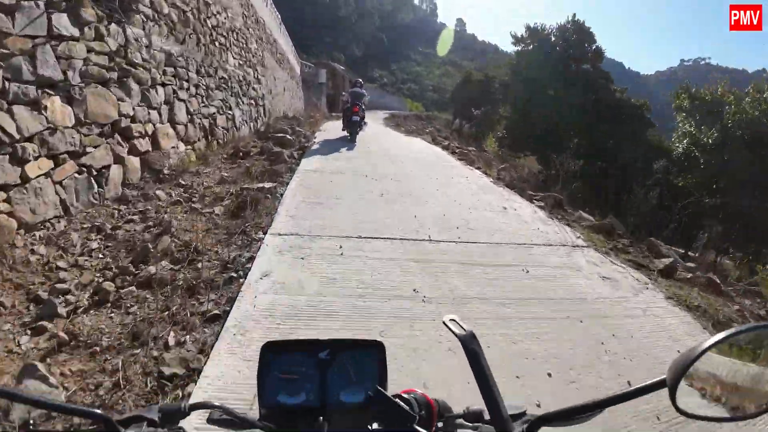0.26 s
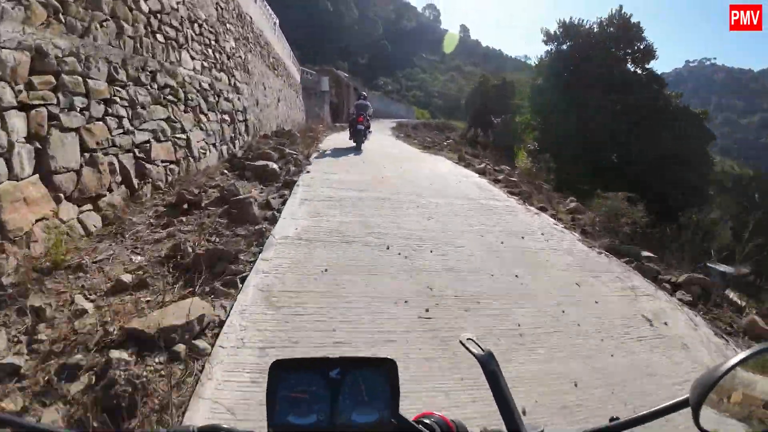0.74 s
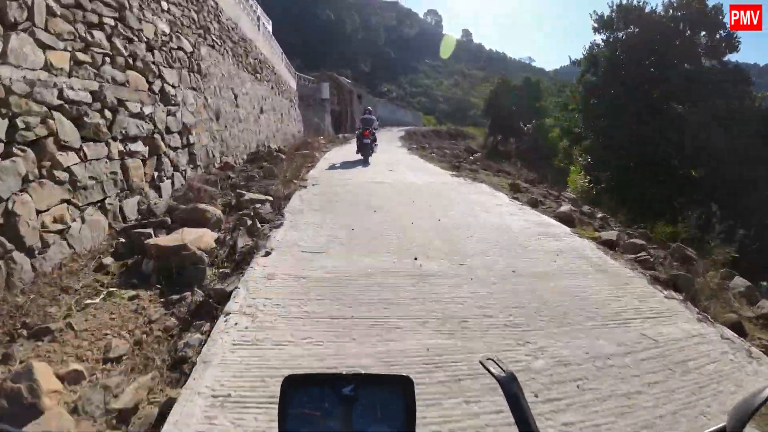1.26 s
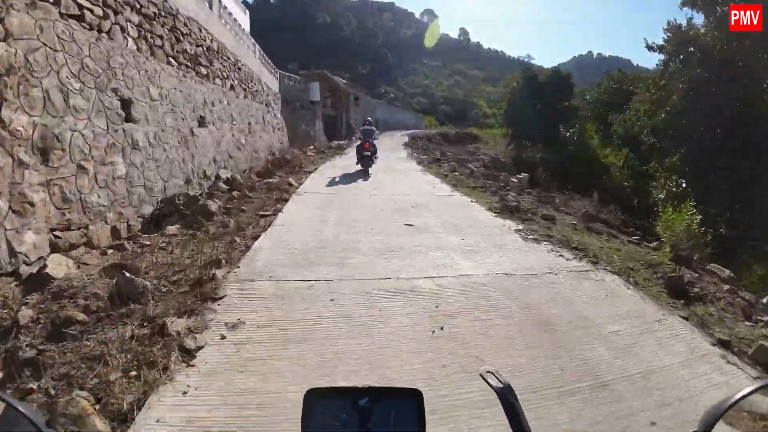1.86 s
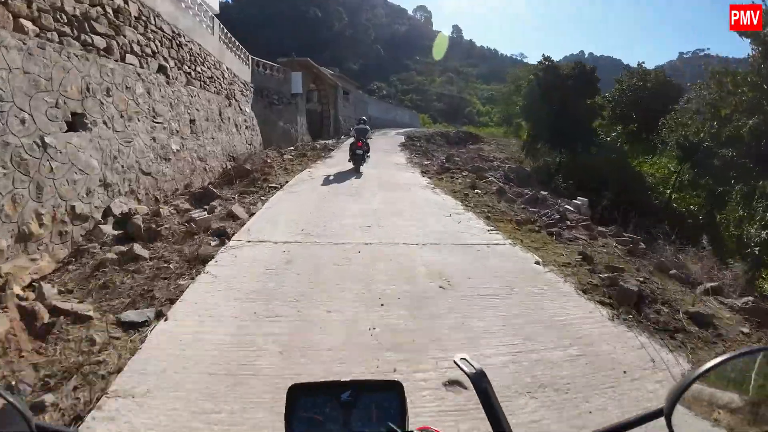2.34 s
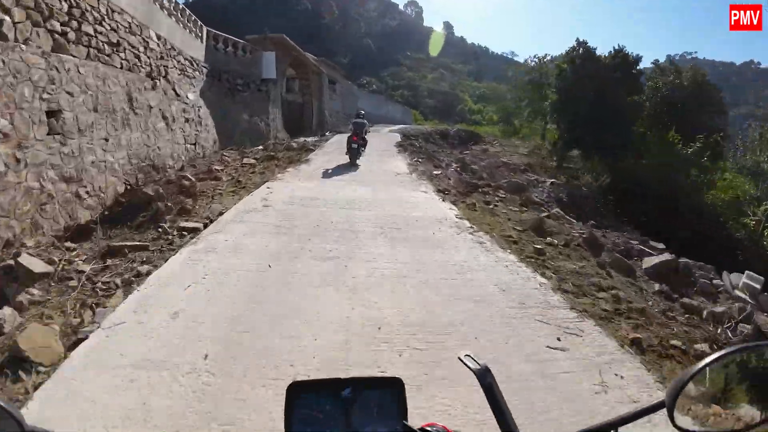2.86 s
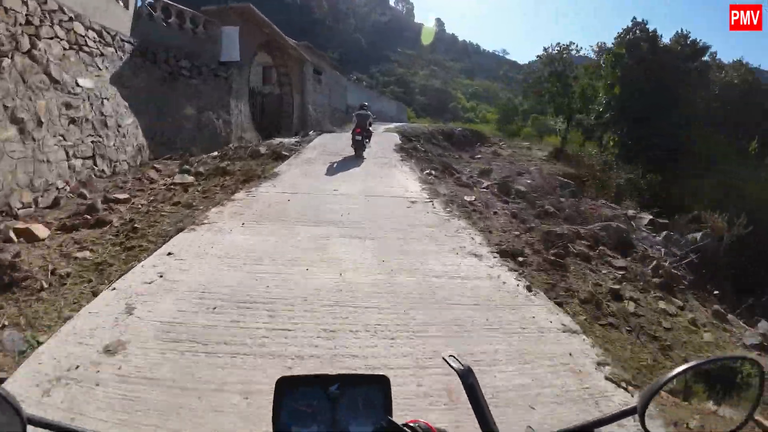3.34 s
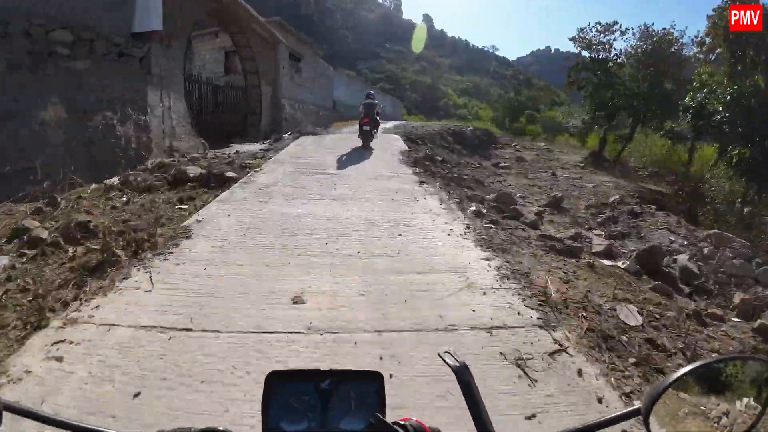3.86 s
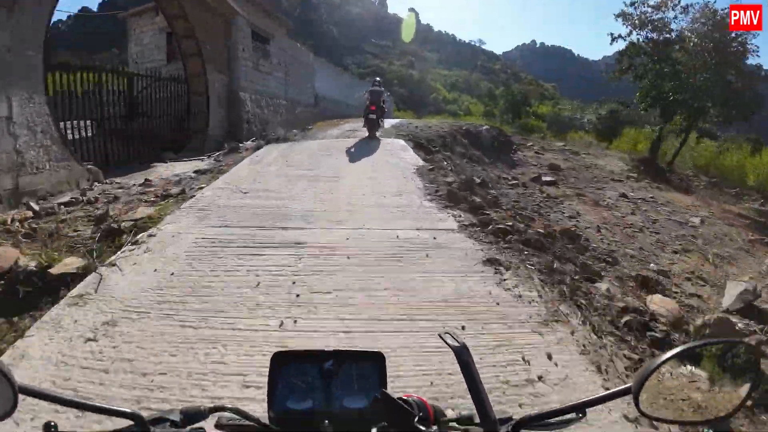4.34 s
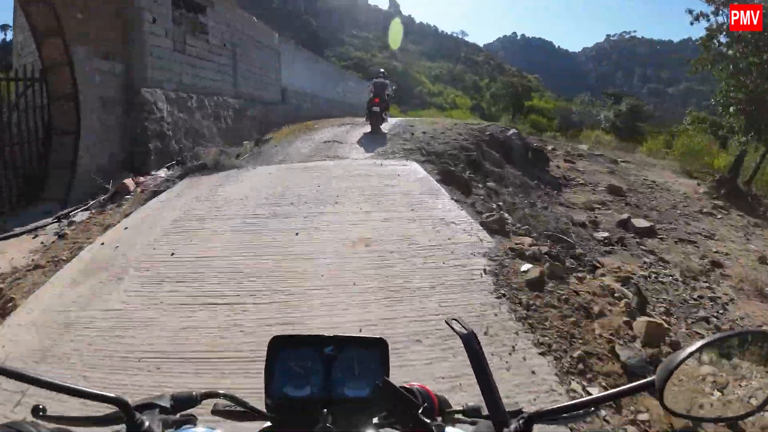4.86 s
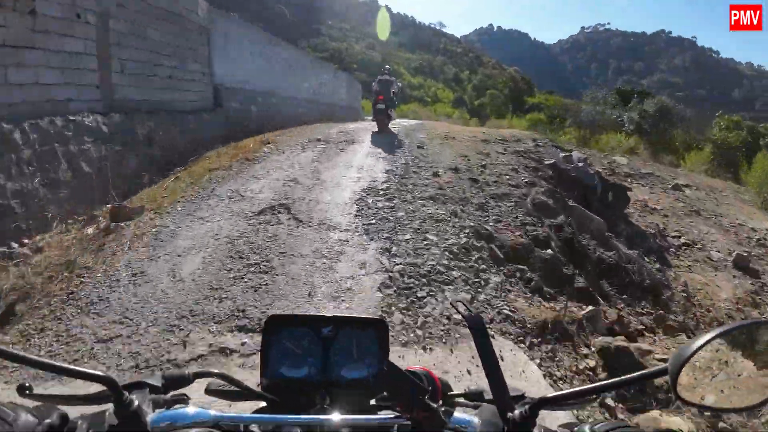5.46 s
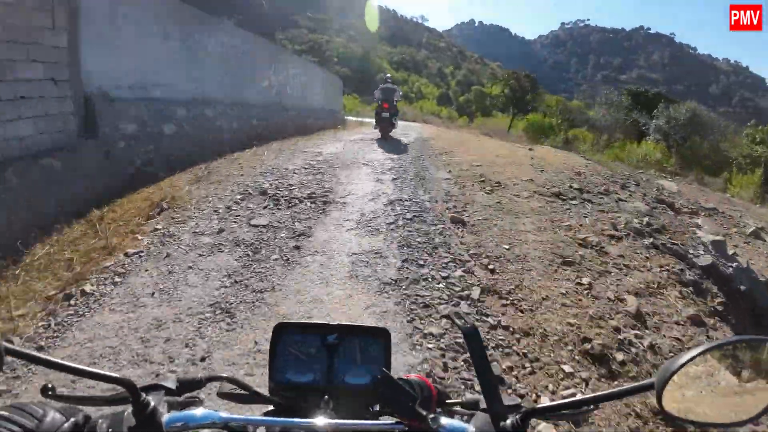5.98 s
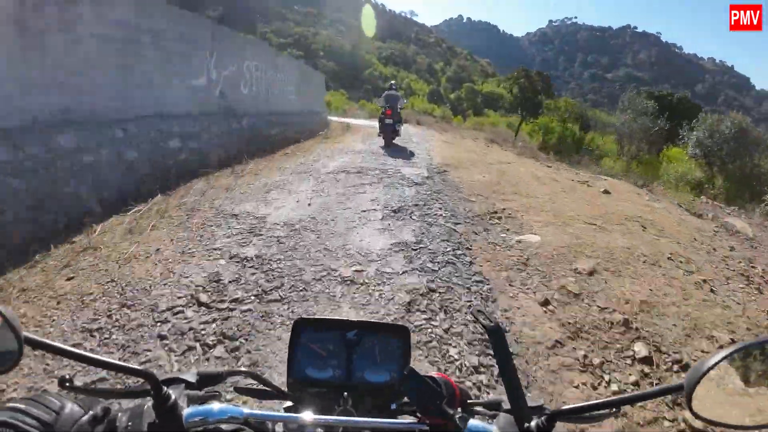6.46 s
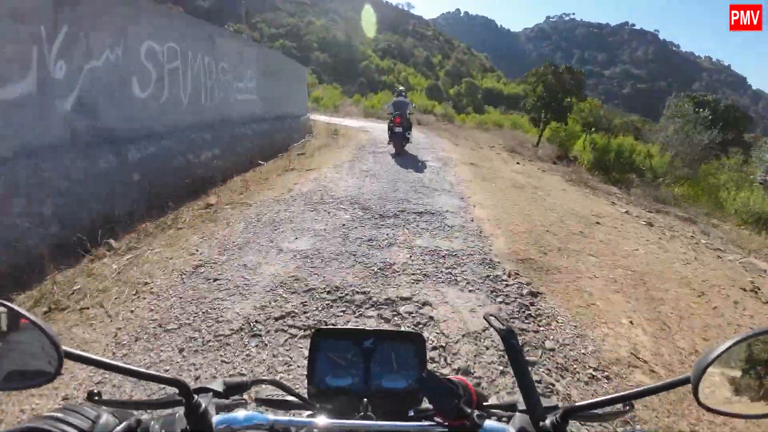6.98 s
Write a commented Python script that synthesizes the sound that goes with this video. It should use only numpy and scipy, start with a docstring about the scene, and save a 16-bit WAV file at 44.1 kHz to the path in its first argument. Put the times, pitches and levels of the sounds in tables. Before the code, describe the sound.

Close on the handlebars of a small single-cylinder motorcycle outdoors. The throaty engine climbs in pitch and loudness for a second and a half, falls away sharply in a brief coasting gear change, then pulls again at a lower note. It settles into an even drone with valve clatter and faint gear whine, finally rolling onto gravel with small stone ticks.

```python
"""A single-cylinder four-stroke motorcycle climbs a concrete lane, heard from the rider's seat.
It revs up, coasts through a gear change, pulls again and eases off onto gravel.
Sums of engine orders make the boom, exhaust and intake; filtered noise makes the gas rasp and valve clatter,
and paired tones at the tooth rate make the gears. Behind them stones tick, gravel patters,
a metal part squeaks faintly, and tyres and headwind rumble as coloured noise."""
import sys
import numpy as np
from scipy import signal
from scipy.fft import rfft, irfft, next_fast_len
from scipy.io import wavfile
from scipy.ndimage import map_coordinates

SR = 44100
rng = np.random.default_rng(int(sys.argv[2]) if len(sys.argv) > 2 else 0)


def generate_wav(sig):
    """Save sig (samples, or channels by samples) to the path in sys.argv[1] as 16-bit PCM at SR."""
    pcm = np.round(np.clip(np.atleast_2d(sig).T, -1, 1) * 32767).astype(np.int16)
    wavfile.write(sys.argv[1], SR, pcm)


N = 318351

# engine speed: (time [s], firing rate [1/s])
ENGINE_SPEED = [(0.0, 39.7), (0.15, 39.55), (0.7, 46.63), (0.95, 49.13), (1.49, 58.24), (1.65, 52.11),
                (2.02, 43.8), (2.25, 32.71), (2.48, 33.42), (2.6, 34.97), (3.55, 40.72), (3.85, 40.75),
                (4.0, 41.75), (4.4, 42.56), (5.5, 38.82), (5.68, 37.17), (5.8, 38.43), (5.95, 37.32),
                (6.62, 38.21), (6.76, 37.13), (6.92, 37.65), (7.22, 37.0)]
# the rider's hand: (time [s], throttle opening [0-1])
THROTTLE_HAND = [(0, 0.6), (.12, 0.53), (.3, 0.76), (.7, 0.77), (1.48, 1), (1.56, 0.44), (2.08, 0.06),
                 (2.3, 0.52), (2.55, 0.82), (3.6, 0.84), (4.0, 0.38), (4.4, 0.51), (4.7, 0.1), (5.68, 0.27),
                 (5.8, .68), (6.7, 0.47), (7.21, 0.3)]
# the gear change: the wheel drives the engine between these times
COAST_FROM_S, COAST_TO_S, COAST_FADE_S = 1.545, 2.045, 0.02
# each change of load leaves a short hush in the boom and intake
HUSH_S, HUSH_DB = 0.024, 8.5
CRUISE_RATE = 40  # firings per second at which the loudness laws start

# the four lowest engine orders:
# (level at shut throttle [dB], rise at full throttle [dB], change while coasting [dB])
LOW_ORDERS = [(-33, -4, -14), (-26.5, 5.5, -3.5), (-43, 5, 4.5), (-47.5, 10, 8.5)]
# how strongly the bike radiates those orders as they sweep: (frequency [Hz], gain [dB])
BODY_RADIATION = [(35, -7), (48, 2), (62, -10.5), (80, -6), (100, -1.5), (118, 0), (135, 10.5), (152, 10),
                  (170, 10.5), (192, 1), (212, 1), (235, 10)]
# brief sags of the crank-rate drone: (time [s], length [s], depth [dB])
DRONE_SAGS = [(3.35, 0.076, 14), (4.106, 0.11, 6), (4.667, 0.062, 7), (4.86, 0.051, 13), (5.084, 0.077, 11),
              (5.58, 0.29, 11), (6.09, .1, 2), (6.51, 0.62, 4), (7.08, 0.31, 5)]

# loudness laws, one per engine sound: (gain at cruising speed with shut throttle [dB],
# rise at full throttle [dB], rise per octave of speed [dB], change while coasting [dB])
BARK_LOUDNESS = (-45.5, 3, 9, -5.5)
PIPE_LOUDNESS = (-69, 11, 21.5, -3)
RASP_LOUDNESS = (-48, 8, 11.5, 0.9)
HONK_LOUDNESS = (-49, 19.5, 7, -2.5)
CLATTER_LOUDNESS = (-58, 3.5, 11.5, -3.5)
HISS_LOUDNESS = (-69.5, 11, 7.5, 4)

# resonances of each part: (centre [Hz], width [Hz], relative level [dB])
SILENCER_MODES = [(165.8, 13.8, 16.5), (430, 310, -16.5), (556.3, 66, 1.5), (663, 31, -13.5)]
PIPE_MODES = [(812, 35, 5.5), (999, 46, 0.5), (1250, 180, -7), (1440, 84, -15), (1810, 400, -30)]
AIRBOX_MODES = [(264.3, 114, 2.5), (325.4, 43, 7.5), (482, 26, -7.5)]
CASING_MODES = [(1396, 180, 0), (1880, 273, 1.5), (2346, 186, 0.5), (2745, 117, 5), (3160, 380, -4.5),
                (3720, 160, -10), (4080, 170, -13), (5420, 250, -14.5), (5930, 260, -13.5)]
# noise colour of the rasping exhaust gas: (frequency [Hz], relative level [dB])
GAS_COLOUR = [(120, -15), (300, 1), (430, -2.5), (580, -2.5), (700, -12), (830, -8.5), (980, -9),
              (1120, -15), (1260, -17.5), (1600, -27.5), (2600, -24), (5000, -48.5)]
# noise colour of hissing air and fine gravel: (frequency [Hz], relative level [dB])
HISS_COLOUR = [(1500, -28.5), (4000, 3.5), (6500, -2), (8000, -5), (9900, -5.5), (11000, -2.5),
               (14500, -6.5), (16000, 3.5)]
# level of the metallic gear whine: (time [s], level [dB])
GEAR_WHINE = [(0, -66), (.3, -51.5), (.9, -61), (1.45, -63), (1.65, -67), (2.6, -64), (3.2, -64),
              (3.55, -57.5), (4.46, -56), (4.7, -66), (5.62, -78), (6.04, -62), (7.21, -64.5)]

# stones and rattles: (time [s], relative level [dB], lower edge of the ringing band [Hz])
STONE_TICKS = [(5.83, -42, 1570), (6.2313, -37, 1540), (6.6894, -51, 2740), (6.7594, -41, 1520),
               (6.788, -31, 1580), (6.9038, -31.5, 1400), (6.9744, -48, 2750), (7.0194, -49, 1810),
               (7.031, -33, 1450)]
# thin metal squeaks: (time [s], length [s], level [dB])
METAL_SQUEAKS = [(1.745, .05, -67), (1.89, .08, -72), (5.696, 0.13, -73), (6.517, .04, -69),
                 (6.81, 0.075, -69.5), (6.948, 0.027, -65), (7.12, .07, -71)]
# noise colour of tyres and headwind: (frequency [Hz], relative level [dB])
ROAD_COLOUR = [(12, -1), (25, -5.5), (70, 0), (120, -5.5), (250, -7.5), (420, -8), (620, -10), (900, -26),
               (1500, -27), (4000, -59)]
TOP_HZ = 15750  # upper band limit of the whole sound


def boom(cycle, suction_at=0.259, lead=0.016, load_delay=0.066, coast_delay=0.16,
         unsteady_db=0.5, idle_unsteady_db=0.74):
    """The lowest orders sweep through the bike's resonances and meet in a suction behind each blow."""
    speed, throttle, coast = curves(ENGINE_SPEED)[0], curves(THROTTLE_HAND)[0], coasting()
    body_hz, body_db = np.transpose(BODY_RADIATION)
    sag_db = sum(depth_db * swell(s, length) for s, length, depth_db in DRONE_SAGS)
    # light throttle burns less evenly
    waver_db = unsteady_db + idle_unsteady_db * (1 - throttle) * (1 - coast)
    # timings are shares of a cycle: the suction comes later under load and when coasting
    stroke = cycle - suction_at - load_delay * throttle - coast_delay * coast
    wave = 0
    for k, (base_db, throttle_db, coast_db) in enumerate(LOW_ORDERS, 1):
        radiated_db = np.interp(np.log(k * speed), np.log(body_hz), body_db)
        db = base_db + throttle_db * throttle + coast_db * coast + radiated_db
        db = db + waver_db * wobble(16)
        if k == 2:  # the crank rate
            db = db - sag_db
        wave = wave - np.sqrt(2) * amp(db) * np.cos(2 * np.pi * k * (stroke + lead * k))
    return wave


def exhaust(cycle):
    """The blow, the piston's push and a late echo ring the silencer and the pipe; the gas rasps."""
    bark_strokes = [(.023, 1), (.21, 0.29), (.635, 0.3)]
    bark = pulse_train(cycle, bark_strokes, SILENCER_MODES, low_hz=171, high_hz=823, count=22)
    ring_strokes = [(.08, 0.8), (.35, 0.62), (.62, 0.41)]
    ring = pulse_train(cycle, ring_strokes, PIPE_MODES, low_hz=626, high_hz=2400, count=38)
    rasp = coloured(noise() * (1.3 + gate(cycle, at=0.22, width=0.22)), GAS_COLOUR)
    bark = loudness(BARK_LOUDNESS) * strength(cycle, scatter_db=0.04) * bark
    return bark + loudness(PIPE_LOUDNESS) * ring + loudness(RASP_LOUDNESS) * rasp


def intake(cycle):
    """The airbox honks at each gulp of air, more weakly at each blow, and loudest at open throttle."""
    gulps = [(0.4507, 0.78), (0.02, 0.28)]
    honk = -pulse_train(cycle, gulps, AIRBOX_MODES, low_hz=154, high_hz=980, count=17)
    return loudness(HONK_LOUDNESS) * strength(cycle, scatter_db=0.3) * honk


def valves(cycle):
    """Tappets and chain rattle the casing, hardest while the valves move; air hisses along."""
    taps = gate(cycle, at=0.17, width=0.017)
    taps = taps + 0.62 * gate(cycle, at=0.67, width=0.016)
    taps = taps + .5 * gate(cycle, at=0.044, width=0.017)
    drive = 0.92 + 0.79 * gate(cycle, at=0.52, width=0.084) + 0.18 * taps
    drive = drive * amp(0.72 * wobble(130))
    clatter = unit(filtered(noise() * drive, lambda hz: cavity(hz, CASING_MODES)))
    hiss = amp(0.96 * wobble(11)) * coloured(noise() * (drive + .5), HISS_COLOUR)
    return loudness(CLATTER_LOUDNESS) * clatter + loudness(HISS_LOUDNESS) * hiss


def gears(cycle, overtone_db=3, play=0.29):
    """Loose primary gears chatter at their tooth rate and its octave, ringing the casing under load."""
    teeth_per_cycle = 36
    mesh = 2 * np.pi * (teeth_per_cycle * cycle + play * wobble(120))  # play in tooth spacings
    contact = np.sin(mesh) + amp(overtone_db) * np.sin(2 * mesh)
    contact = contact * (0.32 + gate(cycle, at=0.48, width=0.19))  # each firing loads the teeth
    whine = unit(filtered(contact, lambda hz: cavity(hz, CASING_MODES)))
    return amp(curves(GEAR_WHINE)[0] + 0.84 * wobble(13)) * whine


def stones(level_db=-12, t60=0.055, crack_t60=0.013, crack=.1):
    """Loose stones and rattling parts tick: a short gritty ring with a bright crack."""
    out, t = np.zeros(N + SR), np.arange(SR // 8) / SR
    for s, db, hz in STONE_TICKS:
        burst = rng.standard_normal(len(t))
        band = signal.butter(2, [hz * 1.0, hz * 1.23], "band", fs=SR)
        ring = unit(signal.lfilter(*band, burst))
        tick = ring * amp(-60 * t / t60) + crack * burst * amp(-60 * t / crack_t60)
        out[round(s * SR):][:len(t)] += amp(db + level_db) * tick
    return out[:N]


def grit(start=5.6, rate=110, level_db=-76, spread_db=4, t60=0.013):
    """Off the concrete, the tyres flick up fine gravel: random short bursts of bright noise."""
    flicks = rng.random(N) < rate / SR  # rate in flicks per second
    flicks = flicks * amp(spread_db * np.clip(noise(), -2, 2))
    flicks = flicks * (np.arange(N) > start * SR)
    t = np.arange(SR // 50) / SR
    bursts = signal.fftconvolve(flicks, amp(-60 * t / t60))[:N]
    return amp(level_db) * coloured(noise() * bursts, HISS_COLOUR)


def squeaks(pitch_hz=8980, waver_hz=25):
    """A metal part rubs now and then and sings one high, slightly wavering note."""
    rub = sum(amp(db) * swell(s, length) for s, length, db in METAL_SQUEAKS)
    return rub * np.sin(2 * np.pi * np.cumsum(pitch_hz + waver_hz * wobble(150)) / SR)


def road(level_db, gust_db):
    """Tyres and headwind rumble unevenly under the engine."""
    return amp(level_db + gust_db * wobble(7)) * coloured(noise(), ROAD_COLOUR)


def pulse_train(cycle, strokes, modes, low_hz, high_hz, count):
    """Strokes (share of the cycle, size) ring a cavity: engine orders above the boom, up to count - 1."""
    speed, grid_hz = curves(ENGINE_SPEED)[0], np.arange(SR // 8)
    band = signal.freqs(*signal.butter(2, [low_hz, high_hz], "band", analog=True), grid_hz)[1]
    response = -band * cavity(grid_hz, modes)
    turn = np.exp(2j * np.pi * cycle)
    first = len(LOW_ORDERS) + 1
    spin, wave = turn ** first, 0
    for k in range(first, count):
        # strokes in the same cycle strengthen some orders and cancel others
        blend = sum(size * np.exp(-2j * np.pi * k * at) for at, size in strokes)
        gain = np.interp(k * speed, grid_hz, response * blend)
        wave = wave + (gain * spin).real
        spin = spin * turn
    return np.sqrt(2) * wave


def loudness(law):
    """The gain of one engine sound, from throttle, speed and coasting."""
    base_db, throttle_db, octave_db, coast_db = law
    octaves = np.log2(curves(ENGINE_SPEED)[0] / CRUISE_RATE)
    throttle = curves(THROTTLE_HAND)[0]
    return amp(base_db + throttle_db * throttle + octave_db * octaves + coast_db * coasting())


def coasting():
    """1 while the wheel drives the engine, else 0, with short fades between."""
    t = np.arange(N) / SR
    return np.clip(np.minimum(t - COAST_FROM_S, COAST_TO_S - t) / COAST_FADE_S + .5, 0, 1)


def strength(cycle, scatter_db):
    """Uneven firing: a gain that glides between random strengths, one per cycle."""
    count = np.arange(int(cycle[-1]) + 2)
    return amp(scatter_db * np.interp(cycle, count, rng.standard_normal(len(count))))


def gate(cycle, at, width):
    """A smooth window that opens once per cycle; at and width are shares of the cycle."""
    return np.exp((np.cos(2 * np.pi * (cycle - at)) - 1) / (2 * np.pi * width) ** 2)


def swell(s, length):
    """A smooth bump of height 1 around time s; length in seconds."""
    return np.exp(-(2 * (np.arange(N) / SR - s) / length) ** 2)


def cavity(hz, modes):
    """Complex response of a set of resonances with alternating sign."""
    response = 0
    for k, (centre, width, db) in enumerate(modes):
        damping = 1j * hz * width
        response = response + (-1) ** k * amp(db) * damping / (centre * centre - hz * hz + damping)
    return response


def coloured(x, points):
    """x through a spectrum of (Hz, dB) points, at rms 1."""
    f, db = np.transpose(points)
    return unit(filtered(x, lambda hz: amp(np.interp(np.log(hz + 1), np.log(f), db))))


def filtered(x, response):
    """x times a complex response of frequency."""
    m = next_fast_len(N + SR // 2)
    return irfft(rfft(x, m) * response(np.fft.rfftfreq(m, 1 / SR)), m)[:N]


def curves(rows):
    """One value per sample for each column after the time."""
    s, *cols = np.transpose(rows)
    return [np.interp(np.arange(N) / SR, s, c) for c in cols]


def wobble(rate):
    """A smooth random curve, rate knots a second."""
    knots = rng.standard_normal(int(N * rate / SR) + 4)
    return map_coordinates(knots, [np.arange(N) * rate / SR])


def noise():
    """White noise."""
    return rng.standard_normal(N)


def unit(x):
    """x at rms 1."""
    return x / np.sqrt(np.mean(x ** 2) + 1e-20)


def amp(db):
    """Decibels to gain."""
    return 10 ** (np.asarray(db) / 20)


def scene():
    """All engine sounds follow the count of four-stroke cycles; road sounds join underneath."""
    cycle = np.cumsum(curves(ENGINE_SPEED)[0]) / SR
    hush = amp(-HUSH_DB * (swell(COAST_FROM_S, HUSH_S) + swell(COAST_TO_S, HUSH_S)))
    engine = hush * (boom(cycle) + intake(cycle)) + exhaust(cycle) + valves(cycle) + gears(cycle)
    surroundings = stones() + grit() + squeaks() + road(level_db=-36.5, gust_db=1.5)
    return (engine + surroundings)[None]


def record(dry):
    """A sharp low-pass keeps nothing above the band limit."""
    return filtered(dry[0], lambda hz: hz < TOP_HZ)[None]


dry = scene()
out = record(dry)
generate_wav(out)
```